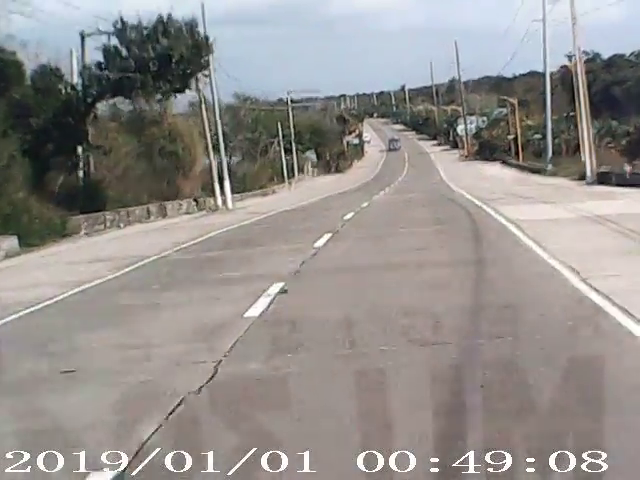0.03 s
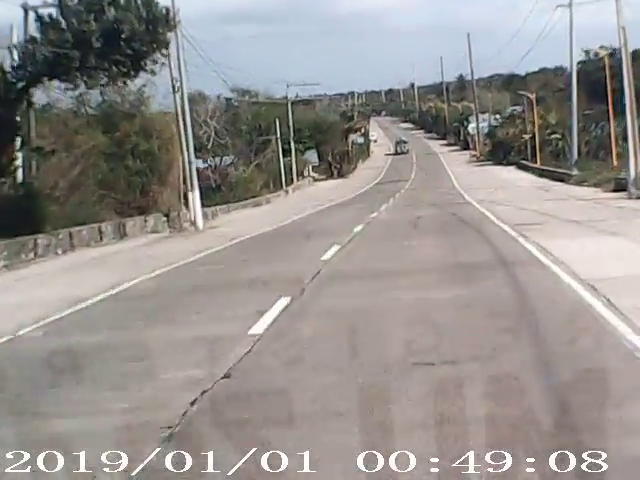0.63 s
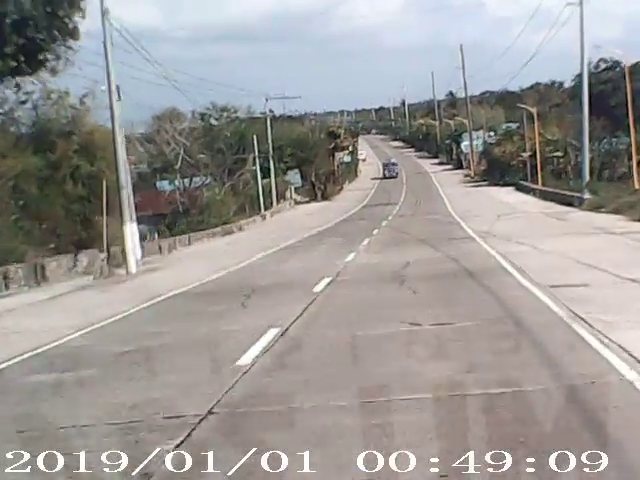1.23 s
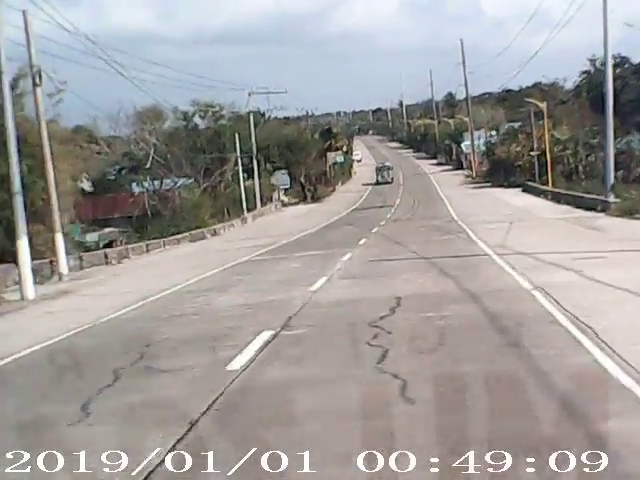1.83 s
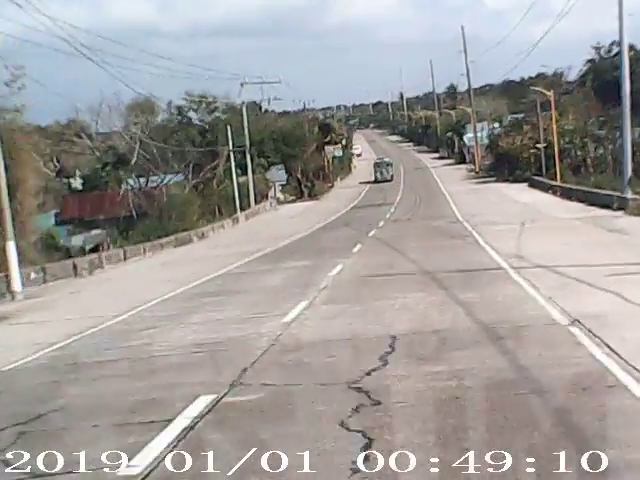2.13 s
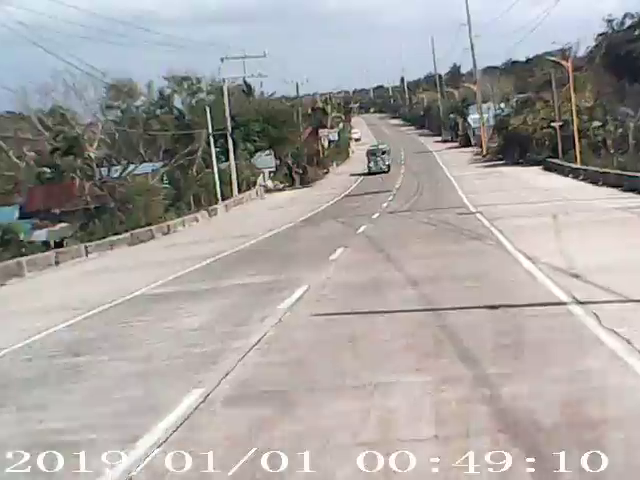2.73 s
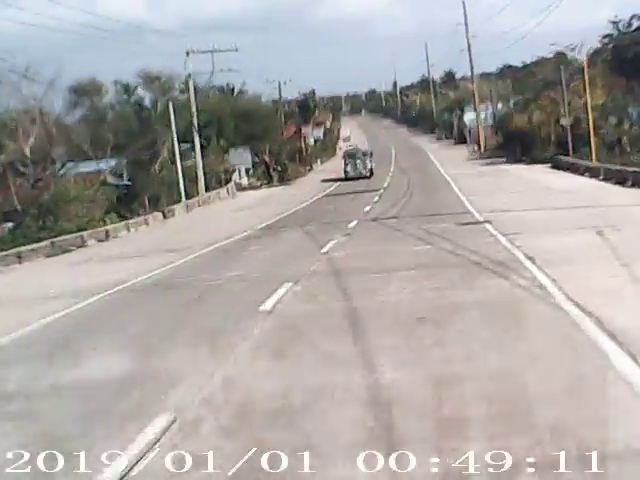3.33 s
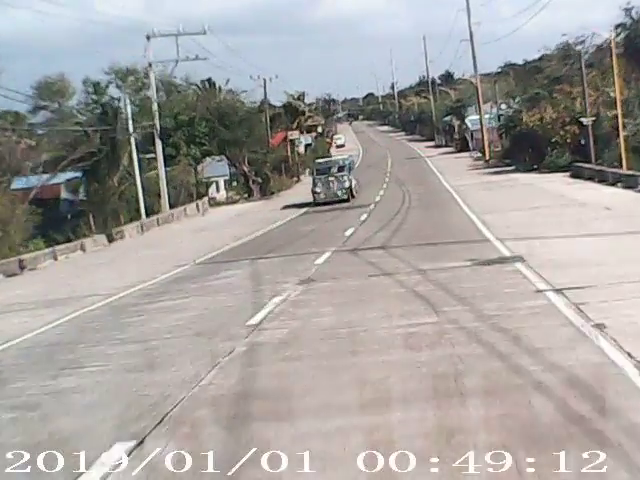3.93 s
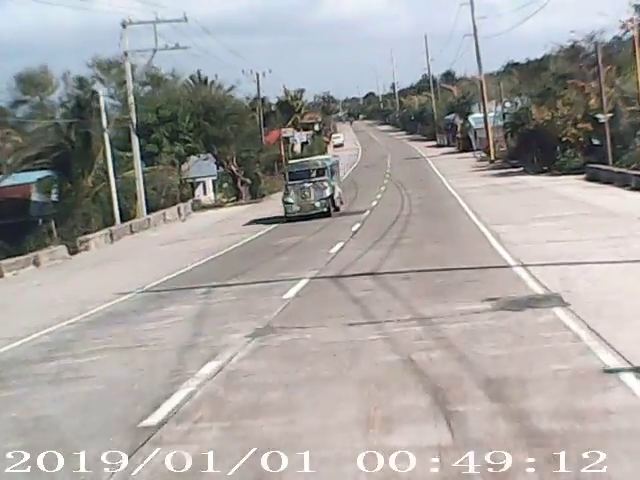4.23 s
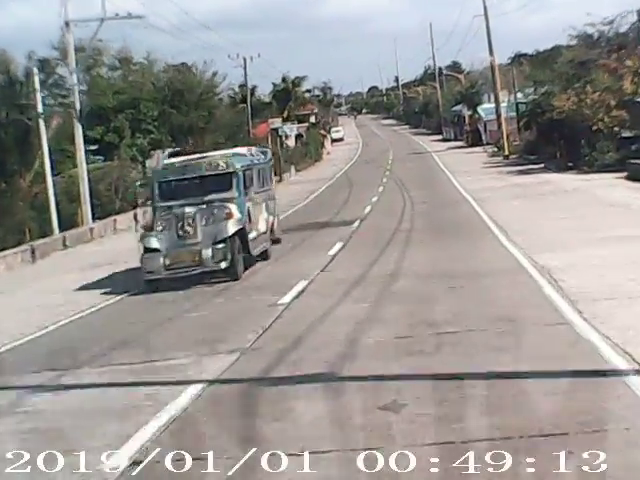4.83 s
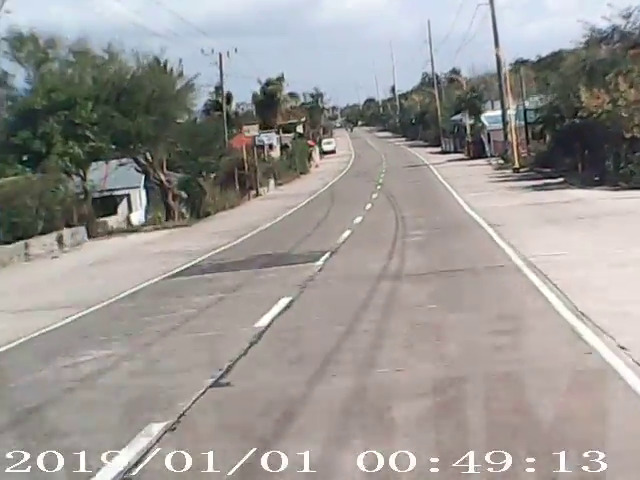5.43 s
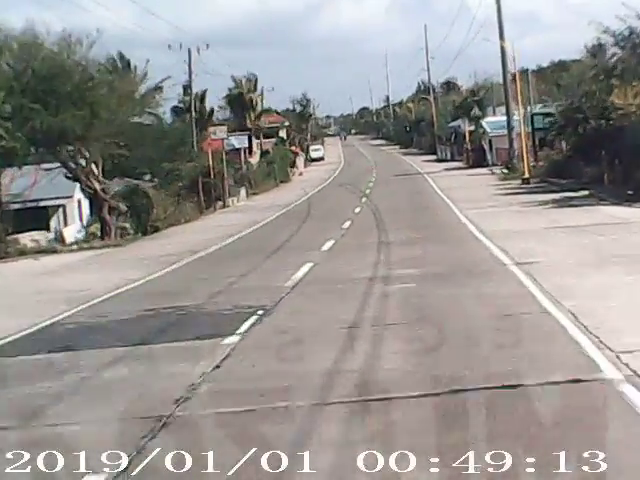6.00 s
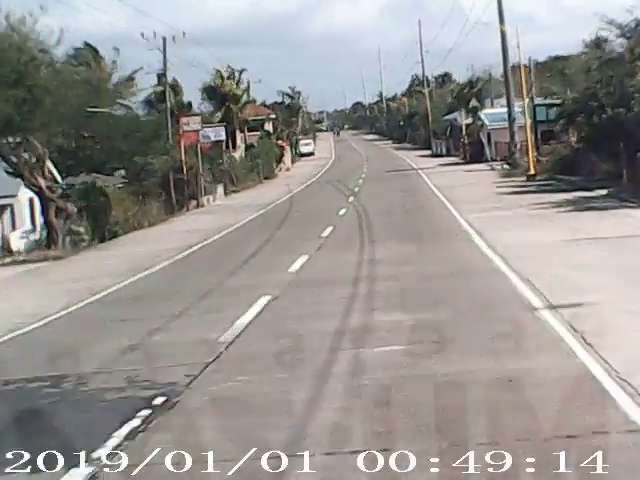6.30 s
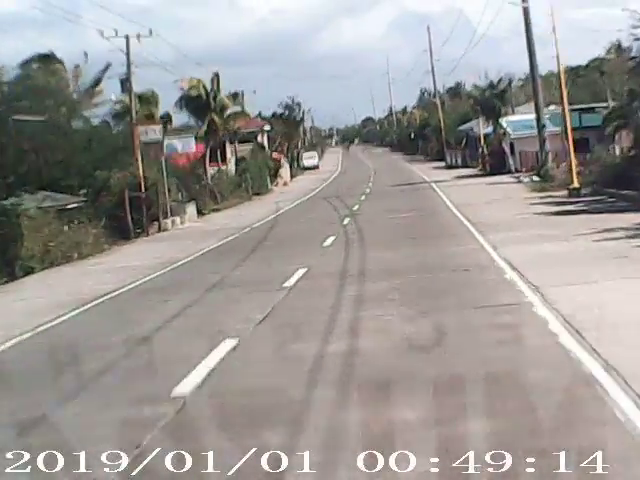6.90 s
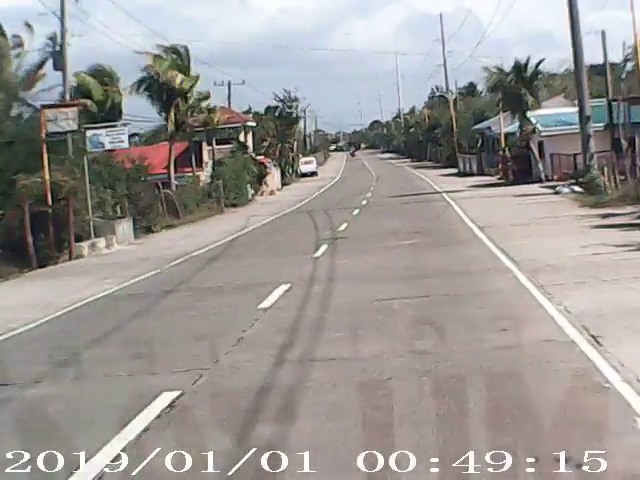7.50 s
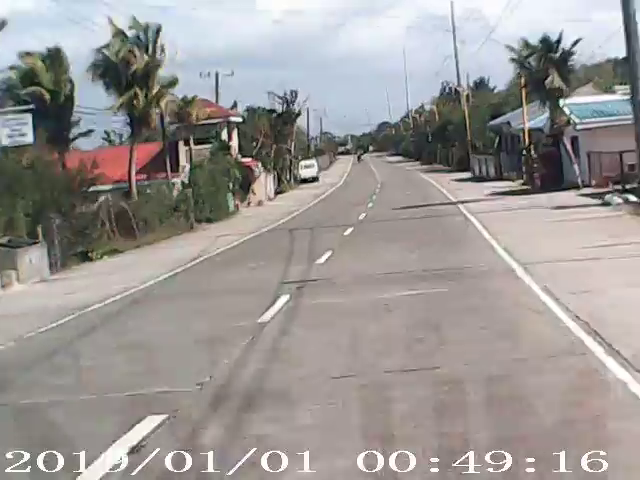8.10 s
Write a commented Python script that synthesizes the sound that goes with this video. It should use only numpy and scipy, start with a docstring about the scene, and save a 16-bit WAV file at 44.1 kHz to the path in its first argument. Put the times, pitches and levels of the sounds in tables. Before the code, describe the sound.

Heard from a microphone riding in the airstream of a moving vehicle, wind buffets and slaps unevenly over low road and engine noise. A loose mount chatters throughout, with harder knocks and a few clipped cracks on bumps. In the last third the gusts weaken and the mount thuds repeatedly on the cracked concrete. The sound is rough and overloaded at its peaks.

```python
"""A small camera rides in the airstream on a vehicle along a cracked concrete road.
From the start tyres and engine rumble, the loose mount rattles and gusts buffet the microphone.
In the first half second surges pin the capsule and hard jolts crack; jolts return near 2.5 s and 5.4 s.
Eddies slap until 5.5 s; then the wind eases and the mount shudders often on the rough concrete.
Throughout, the capsule saturates on big pressure swings and its bass cut turns them into short thuds."""
import sys
import numpy as np
from scipy import signal
from scipy.fft import rfft, irfft
from scipy.io import wavfile
from scipy.ndimage import uniform_filter1d

SR = 44100
rng = np.random.default_rng(int(sys.argv[2]) if len(sys.argv) > 2 else 0)


def dump_mix(stems):
    """Bounce the given channels to the path in sys.argv[1] as a 16-bit WAV at rate SR."""
    frames = np.atleast_2d(stems).T  # one column per channel
    limited = np.clip(frames, -1, 1)  # hard clip at full scale
    pcm = np.round(limited * 32767).astype(np.int16)
    wavfile.write(sys.argv[1], SR, pcm)


N = 359415
T = np.arange(N) / SR

# gusts of wind: (t/s, duration/s, rumble level/dB, grit level/dB)
GUSTS = [(0.042, 0.0082, -16.5, -24.5), (0.091, 0.018, -33, -8.5), (0.213, 0.24, -24.5, -59),
         (0.441, 0.072, -17, -15.5), (0.554, 0.024, -39, -32), (0.803, 0.0073, -14.5, -44),
         (0.888, 0.077, -20.5, -50), (1, 0.26, -21.5, -58), (1.243, 0.075, -20, -59),
         (1.697, 0.16, -15, -57), (1.976, 0.035, -21.5, -56), (2.216, 0.096, -18.5, -55),
         (2.536, 0.18, -21.5, -68), (2.841, 0.028, -18.5, -37), (2.952, 0.061, -20.5, -32.5),
         (3.174, 0.047, -21, -36), (3.402, 0.1, -22, -47), (3.669, 0.077, -22, -55),
         (3.93, 0.45, -32.5, -42), (4.47, 0.25, -24, -37), (4.61, 0.13, -27.5, -52), (4.94, 0.11, -24, -42),
         (5.165, 0.082, -14, -41), (5.382, 0.026, -19, -24), (5.767, 0.36, -29, -65),
         (6.155, 0.19, -28, -67), (6.517, 0.1, -24, -63)]
# eddies that slap the microphone: (t/s, level/dB)
EDDIES = [(.046, -5), (.096, 4), (.202, 7), (.209, -1), (.235, 0), (0.244, -13), (0.266, 2), (0.297, -4),
          (.302, 6.5), (0.339, 0), (0.432, -5), (0.462, -2), (.48, 6), (.487, -27), (0.509, 2.5), (.569, 1),
          (.803, 1), (0.814, -2), (0.909, 6.5), (.933, 2), (0.938, -0.5), (0.944, -3), (0.956, -3.5),
          (.96, 1.5), (0.971, 1), (0.996, 7), (1.004, 4), (1.029, -12), (1.035, 3.5), (1.073, -2),
          (1.08, -9), (1.116, -2.5), (1.214, 5.5), (1.238, -15), (1.263, 2.5), (1.296, 1), (1.343, 0),
          (1.688, 10), (1.698, 8.5), (1.708, -5), (1.715, 4), (1.742, 5), (1.756, -3), (1.766, 2.5),
          (1.793, 4), (1.798, 5), (1.817, 4), (1.843, 2.5), (1.852, 3.5), (1.874, 3), (1.984, -5),
          (2.056, -3.5), (2.109, 0), (2.216, 6.5), (2.222, 4), (2.236, 2.5), (2.242, -2), (2.254, 2),
          (2.281, -6), (2.291, -5.5), (2.299, -6), (2.551, -8), (2.56, 2.5), (2.617, -0.5), (2.649, 3.5),
          (2.669, -5), (2.677, 3.5), (2.703, 8.5), (2.833, -4.5), (2.838, 6), (2.859, -2.5), (2.947, 6),
          (2.953, -3.5), (2.971, -0.5), (3.003, 2.5), (3.009, -5.5), (3.035, -7), (3.099, -4), (3.109, -15),
          (3.172, 6.5), (3.222, -1), (3.226, 5.5), (3.255, 0), (3.288, -6.5), (3.357, -1.5), (3.39, 0),
          (3.402, -3), (3.427, 1.5), (3.477, -2.5), (3.505, -4), (3.545, -6), (3.721, 1), (3.741, -4),
          (4.613, 6.5), (4.656, -3), (4.662, 0.5), (4.673, 5.5), (4.685, 0.5), (5.165, 4), (5.172, -6),
          (5.18, -5), (5.191, -6), (5.2, 7.5), (5.21, -6), (5.222, -6), (5.236, 5), (5.366, -2.5),
          (5.392, 7), (5.419, 2), (5.469, -0.5)]
# shudders of the mount on rough concrete: (t/s, level/dB)
SHUDDERS = [(0.15, 0.5), (0.259, 1), (.270, 0.5), (.326, -2.5), (0.482, 0.5), (2.956, -2), (4.611, -2.5),
            (5.59, -13), (5.794, -1.5), (5.861, -6.5), (5.928, -11), (6.001, -9), (6.184, -8.5),
            (6.225, -4.5), (6.262, -4.5), (6.305, 2), (6.376, -3), (6.478, -11), (6.524, -3.5), (6.554, -5),
            (6.616, 2), (6.661, -8), (6.861, -0.5), (6.896, -8.5), (6.94, -6), (6.985, -4), (7.027, -8.5),
            (7.395, -2), (7.814, -2.5)]


def amp(db):
    """Amplitude ratio of a level in decibels."""
    return 10 ** (np.asarray(db) / 20)


def unit(x):
    """Normalisation to an rms of 1."""
    return x / np.sqrt(np.mean(x ** 2))


def walk(rate_hz):
    """Low-pass random signal of rms 1: held values under two moving averages."""
    k = max(int(SR / rate_hz), 1)
    held = np.repeat(rng.standard_normal(N // 20)[:N // k + 1], k)
    return unit(uniform_filter1d(uniform_filter1d(held, k), k)[:N])


def waver(rate_hz, depth_db):
    """Random amplitude modulation: a gain within depth_db either side of unity."""
    return amp(depth_db * np.tanh(walk(rate_hz)))


def noise(points):
    """Spectral shaping of white noise by (f/Hz, spectral density level/dB) points."""
    hz, db = np.transpose(points)
    f = np.arange(N // 2 + 1) * SR / N + 1e-3
    gain = amp(np.interp(np.log(f), np.log(hz), db)) * np.minimum(f / hz[0], 1)
    return irfft(rfft(rng.standard_normal(N)) * gain, N) * np.sqrt(SR / 2)


def resonate(x, hz, width_hz):
    """Two equal resonators in cascade, for steep skirts."""
    b, a = signal.iirpeak(hz, hz / width_hz, fs=SR)
    return signal.lfilter(b, a, signal.lfilter(b, a, x))


def add(track, start_s, sound):
    """Superposition of a sound on a track."""
    i = int(start_s * SR)
    lo, hi = max(i, 0), min(i + len(sound), N)
    if hi > lo:
        track[lo:hi] += sound[lo - i:hi - i]


def hold(start_s, length_s, attack_s, release_s):
    """Envelope of exponential growth, plateau and exponential decay."""
    before = np.maximum(start_s - T, 0) / attack_s
    after = np.maximum(T - start_s - length_s, 0) / release_s
    return np.exp(-np.minimum(before + after, 20))


def swing(build_s, flip_s, release_s):
    """Bipolar pulse: pressure builds one way, reverses in the middle of 80 ms and relaxes."""
    t = np.arange(-.04, .04, 1 / SR)
    return np.tanh(t / flip_s) * np.exp(-(t / np.where(t < 0, build_s, release_s)) ** 2)


def road():
    """Roughness excitation: the tyres' rumble swells with the surface."""
    # rolling noise: (f/Hz, spectral density level/dB)
    spectrum = [(20, -33), (50, -46.5), (100, -58.5), (150, -56), (250, -58.5), (400, -70.5), (700, -75.5),
                (1300, -83.5), (2000, -100.5), (3000, -101), (4300, -104), (6800, -112)]
    return noise(spectrum) * waver(1.5, 1) * waver(25, 2)


def engine(level_db=-37):
    """Periodic excitation: harmonics 2 to 4 of the firing rate hum under the road."""
    # firing rate: (t/s, f/Hz)
    firing = [(0, 48), (5.7, 49.05), (6.6, 50.1), (8.15, 52.64)]
    firing_hz = np.interp(T, *np.transpose(firing)) * (1 + .008 * walk(9))
    phase = 2 * np.pi * np.cumsum(firing_hz) / SR
    hum = sum(amp(db) * waver(6, 3) * np.sin(k * phase) for k, db in [(2, -6), (3, 0), (4, -5)])
    return amp(level_db) * hum


def airstream(breeze_db=-32, attack_s=.022, release_s=.023):
    """Incoherent addition: the powers of gusts and breeze sum to the wind level in dB."""
    gust_power = sum((amp(db) * hold(s, length, attack_s, release_s)) ** 2 for s, length, db, _ in GUSTS)
    return 10 * np.log10(amp(breeze_db) ** 2 + gust_power)


def buffeting(wind_db, level_db=5, hiss_db=-3):
    """Turbulent pressure fluctuation: big eddies rumble; small ones crackle on their steep flanks."""
    # turbulence: (f/Hz, relative level/dB)
    spectrum = [(20, 9.5), (55, -5), (100, -3.5), (150, -5.5), (250, -18.5), (400, -13.5), (700, -22.5),
                (1300, -29), (2600, -40.5), (3400, -62), (6800, -63.5)]
    air = unit(noise(spectrum))
    big = signal.sosfiltfilt(signal.butter(2, 450, fs=SR, output="sos"), air)
    small = signal.sosfilt(signal.butter(2, 330, "high", fs=SR, output="sos"), air - big)
    flanks = unit(uniform_filter1d(np.gradient(big) ** 2, size=60))
    gust = amp(level_db + wind_db) * waver(70, 5)
    return (big + small * flanks * amp(hiss_db)) * gust


def mount_contacts(beats_per_s=27.6, chatter_db=16, scatter_db=4.8, stray_s=.017, stray_db=-10):
    """Mechanical play: the loose mount chatters and knocks on bumps; gives (t/s, level/dB) rows."""
    # strength of the chatter: (t/s, relative level/dB)
    chatter = [(0, -45.5), (0.3, -42), (0.6, -49), (0.95, -44), (1.4, -54.5), (1.7, -43.5), (2.4, -46.5),
               (2.9, -49.5), (3.3, -56.5), (4.2, -42), (4.33, -52), (4.45, -38), (4.75, -47.5), (5.05, -43),
               (5.65, -52), (5.8, -42), (6.9, -45), (7.85, -50), (8.15, -42.5)]
    # harder knocks on bumps: (t/s, level/dB)
    knocks = [(.086, -16.5), (.308, -21.5), (.324, -17.5), (.449, -18.5), (.483, -14), (.504, -15.5),
              (.753, -22), (.796, -22.5), (1.636, -25.5), (1.763, -11), (2.194, -21), (2.457, -21),
              (4.164, -24), (4.452, -18.5), (4.499, -23.5), (4.548, -25), (4.589, -20.5), (4.825, -24),
              (4.912, -21), (5.06, -21), (5.881, -25.5), (6.019, -27), (6.143, -20.5), (6.241, -20),
              (6.285, -21), (6.322, -24), (6.5, -29), (6.912, -22)]
    later, louder, stray_later, stray_louder = rng.uniform(-1, 1, (400, 4)).T
    beats = np.cumsum(np.exp(.24 * later)) / beats_per_s
    levels = np.interp(beats, *np.transpose(chatter)) + chatter_db + scatter_db * louder
    # the mount falls back once more after each beat
    strays = zip(beats + stray_s * np.exp(stray_later / 2), levels + stray_db + scatter_db * stray_louder)
    return list(knocks) + list(zip(beats, levels)) + list(strays)


def rattle(level_db=3, contact_s=.00022, bounce_s=.0036, bounce_db=-9, push_db=-8, push_hz=500):
    """Impact excitation of modes: each contact bounces twice, rings the housing and nudges the capsule."""
    # modes of the plastic housing: (f/Hz, bandwidth/Hz, level/dB)
    modes = [(1340, 310, -2.5), (2140, 1200, -1.5), (3004, 710, 0), (4150, 340, -3), (4530, 570, -4),
             (5290, 550, -9), (6480, 1460, -4)]
    age = np.arange(SR // 100) / SR / contact_s
    pulse = age * np.exp(1 - age)
    force = np.zeros(N)
    for (s, db), (gap1, loss1, gap2, loss2) in zip(mount_contacts(), rng.uniform(.2, 1.8, (900, 4))):
        for gap, loss in [(0, 0), (gap1, loss1), (gap1 + gap2, loss1 + loss2)]:
            add(force, s + bounce_s * gap, amp(db + bounce_db * loss) * pulse)
    ring = np.zeros(N)
    for hz, width_hz, db in modes:
        drive = force * np.sign(rng.standard_normal(N)) * waver(43, 1.3)  # contacts favour varying modes
        ring += amp(db) * unit(resonate(drive, hz, width_hz))
    push = signal.lfilter(*signal.butter(1, push_hz, fs=SR), force)
    force_rms = np.sqrt(np.mean(force ** 2))
    return amp(level_db) * (unit(ring) * force_rms - amp(push_db) * push)


def grit(level_db=-1, fade_s=.003, eddy_db=-20, shudder_db=-18, crunch_s=.0034, lead_s=.0012):
    """Intermittency: fine turbulence spurts through each gust and just ahead of each slap and shudder."""
    # fine turbulence: (f/Hz, relative level/dB)
    spectrum = [(450, 9), (1000, -1), (2700, -12), (3300, -18), (6800, -29.5)]
    strength = sum(amp(db) * hold(s, length, fade_s, fade_s) for s, length, _, db in GUSTS)
    crunch = np.zeros(N)
    t = np.arange(-SR // 20, SR // 20) / SR
    for events, share_db in [(EDDIES, eddy_db), (SHUDDERS, shudder_db)]:
        for s, db in events:
            add(crunch, s - lead_s + t[0], amp(db + share_db) * np.exp(-abs(t) / crunch_s))
    spurts = waver(350, 6) * waver(140, 7)
    return unit(noise(spectrum) * spurts) * np.hypot(amp(level_db) * strength, crunch)


def slaps(lean_s=.005, flip_s=.00093):
    """Convected eddies: each swings the pressure over, in opposite polarity to the one before."""
    out = np.zeros(N)
    stretches = np.exp(rng.uniform(-1, 1, (len(EDDIES), 3)) / 4)
    for k, ((s, db), stretch) in enumerate(zip(EDDIES, stretches)):
        wave = swing(lean_s * stretch[0], flip_s * stretch[1], lean_s * stretch[2])
        add(out, s - len(wave) / SR / 2, (-1) ** k * amp(db) * wave)
    return out


def surges(level_db=4, edge_s=.00072):
    """Dynamic pressure: wind pins the capsule in flat pulses, whose edges the bass cut leaves as thuds."""
    # pressure surges: (t/s, duration/s)
    pulses = [(.1055, .013), (.1520, .014), (.1695, .019)]
    pressure = sum(np.tanh((T - s) / edge_s) - np.tanh((T - s - length) / edge_s) for s, length in pulses)
    return amp(level_db) * pressure / 2


def jolts(build_s=.00011, flip_s=.00002, release_s=.00024):
    """Mechanical shock: the mount hits its stop and the abrupt pressure reversal is a broadband crack."""
    # hits on the stop: (t/s, level/dB)
    hits = [(.1100, 9), (.1740, 0), (.2388, 10), (.2976, 10), (.3677, 4), (2.2850, 14), (2.6558, 15),
            (2.7196, 15), (5.3712, -2), (5.4255, 1)]
    wave = swing(build_s, flip_s, release_s)
    out = np.zeros(N)
    for s, db in hits:
        add(out, s - len(wave) / SR / 2, -amp(db) * wave)
    return out


def shudders(level_db=-2.5, thud_db=-1, thud_s=.0057, flip_s=.00093, centre_hz=215, shake_s=.0042):
    """Transient vibration: the mount thuds and shakes for a cycle or two, each time at another pitch."""
    out = np.zeros(N)
    thud = amp(thud_db) * swing(thud_s, flip_s, thud_s)
    t = (np.arange(len(thud)) - len(thud) / 2) / SR
    for (s, db), (octaves, phase) in zip(SHUDDERS, rng.uniform(-1, 1, (len(SHUDDERS), 2))):
        shake = np.cos(2 * np.pi * centre_hz * 2 ** octaves * t + phase) / np.cosh(2 * t / shake_s)
        add(out, s + t[0], amp(db + level_db) * (thud + shake))
    return out


def scene():
    """Linear superposition of vehicle, wind and mount as pressure at the microphone."""
    vehicle = road() + engine()
    wind = buffeting(airstream()) + grit() + slaps() + surges()
    mount = shudders() + jolts() + rattle()
    return (vehicle + wind + mount)[None]


def record(dry):
    """Nonlinear distortion: the capsule saturates; a bass cut, hard clipping and band limiting follow."""
    saturation, ceiling, headroom = .95, .7, .72
    bass_cut_hz, band_hz, top_hz = 239, 7050, 16500
    saturated = dry / (1 + (dry / saturation) ** 8) ** (1 / 8)
    thin = signal.lfilter(*signal.butter(1, bass_cut_hz, "high", fs=SR), saturated)
    clipped = np.clip(thin, -ceiling, ceiling)
    low_pass = signal.firwin(201, band_hz, window=("kaiser", 8), fs=SR)
    narrow = signal.fftconvolve(clipped, low_pass[None], "same")
    reclipped = np.clip(narrow, -headroom, headroom)  # the hardest cracks overshoot and clip again
    return signal.sosfilt(signal.ellip(8, .2, 70, top_hz, fs=SR, output="sos"), reclipped)


dry = scene()
out = record(dry)
dump_mix(out)
```